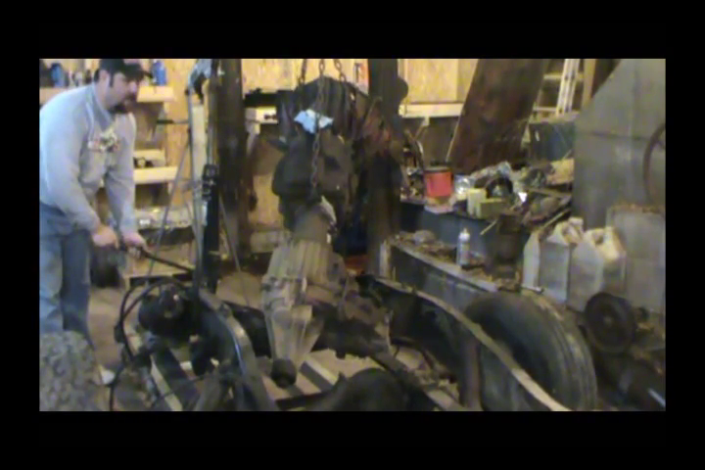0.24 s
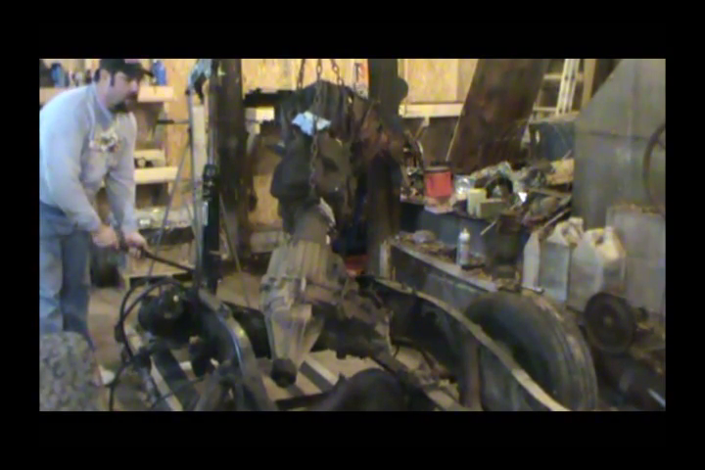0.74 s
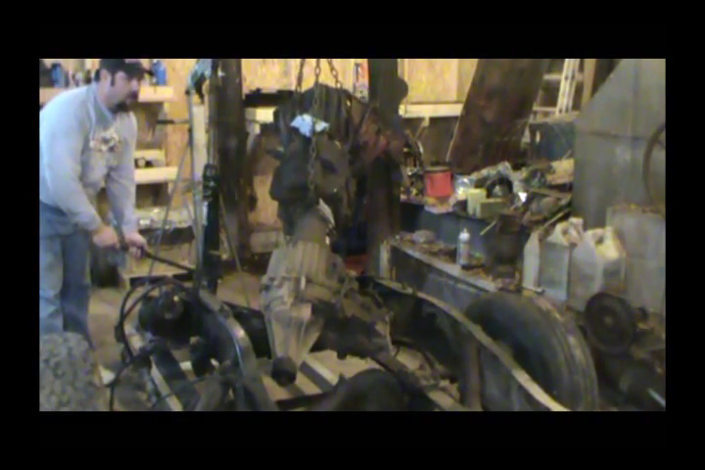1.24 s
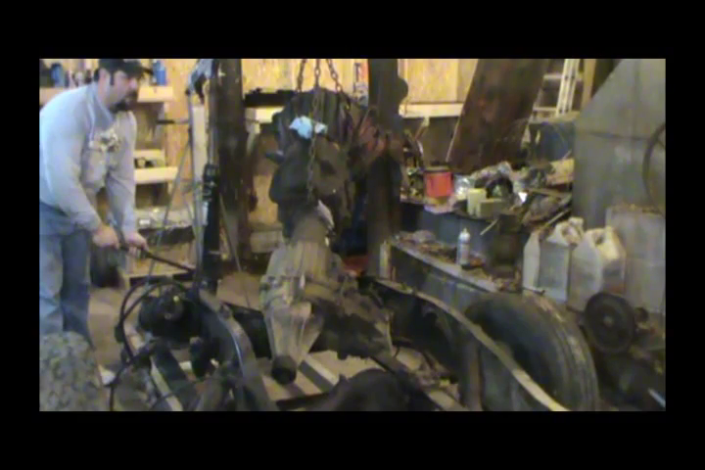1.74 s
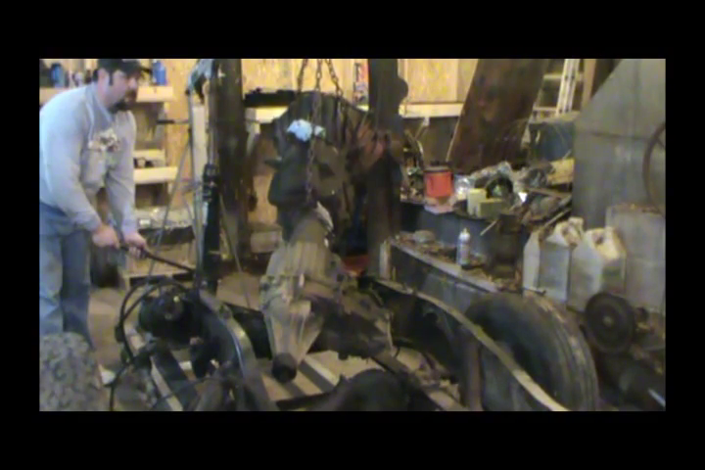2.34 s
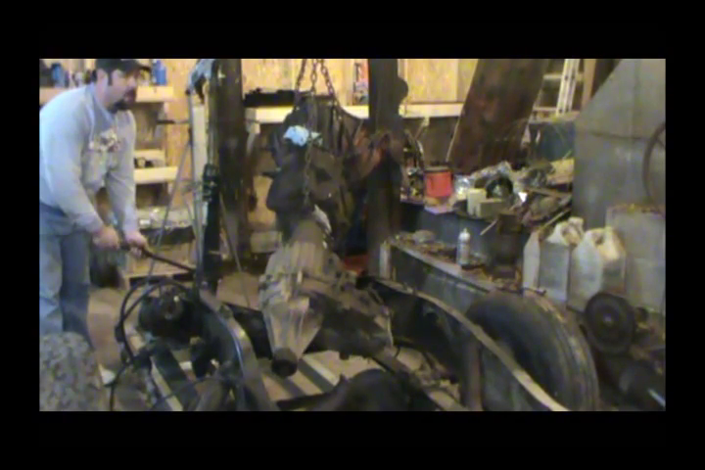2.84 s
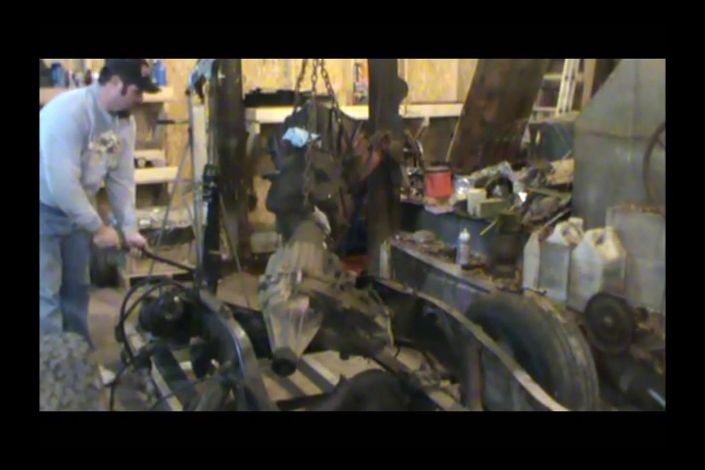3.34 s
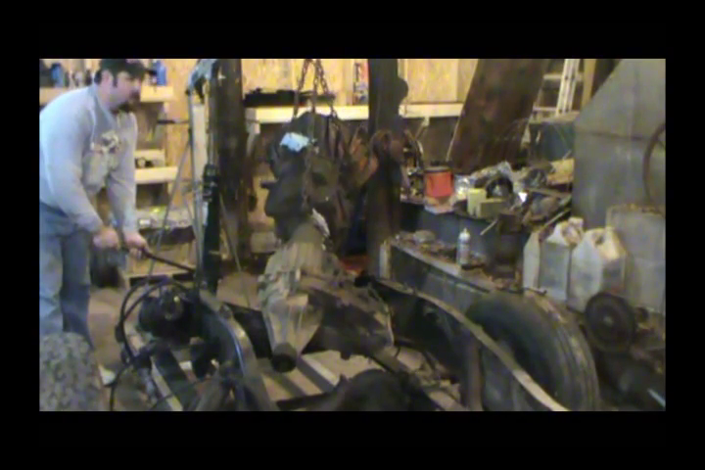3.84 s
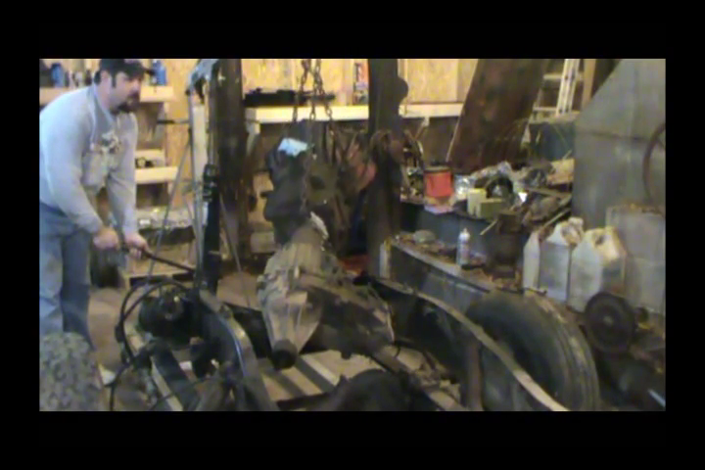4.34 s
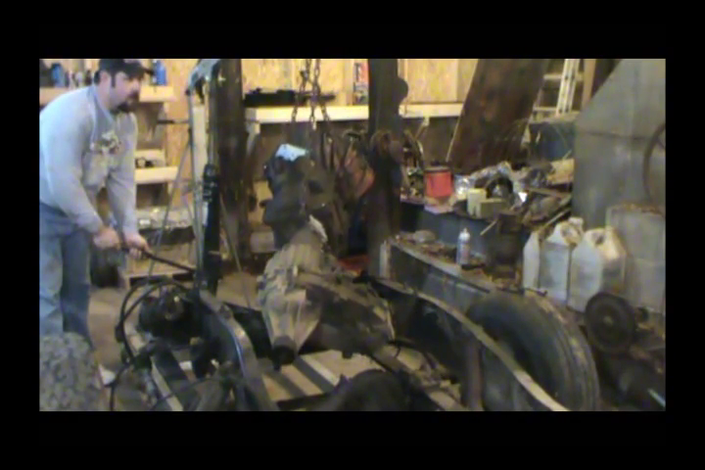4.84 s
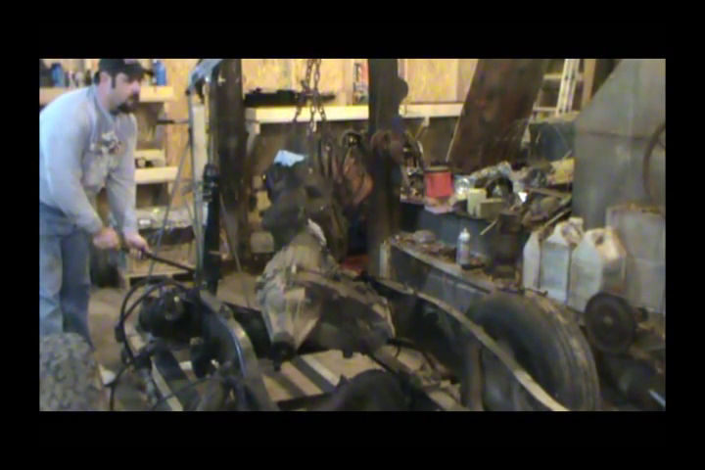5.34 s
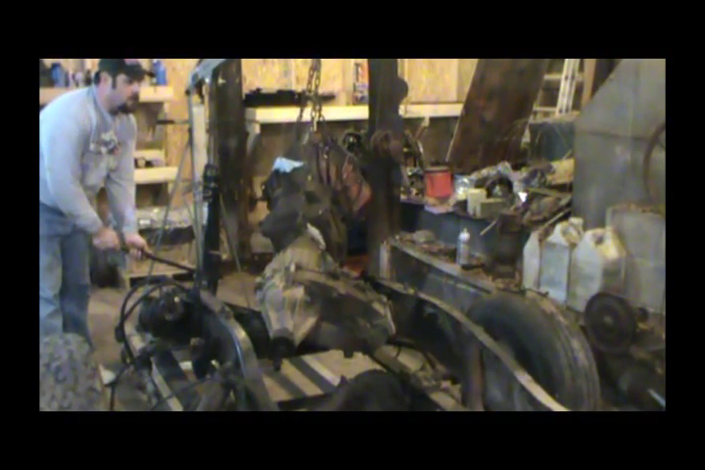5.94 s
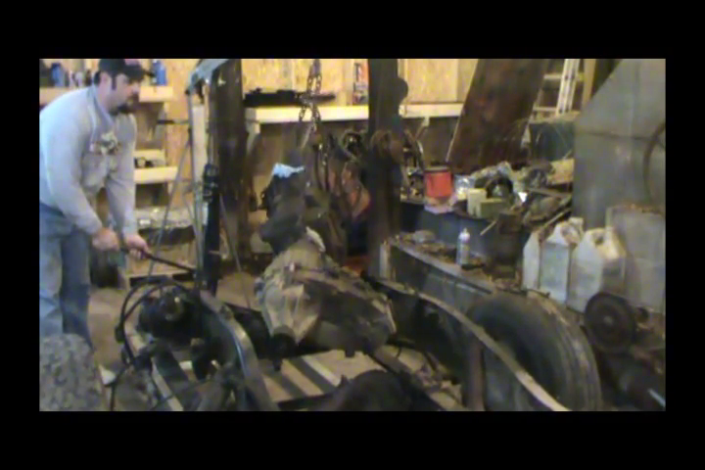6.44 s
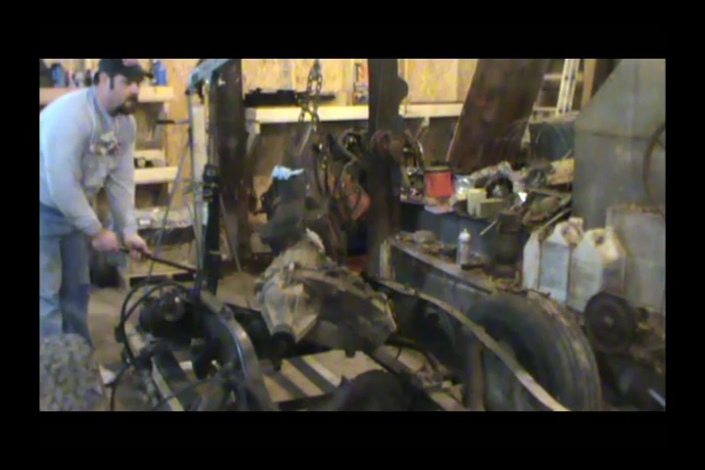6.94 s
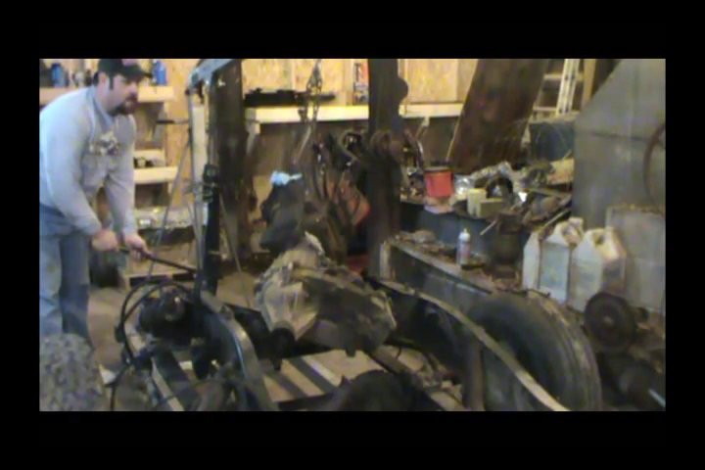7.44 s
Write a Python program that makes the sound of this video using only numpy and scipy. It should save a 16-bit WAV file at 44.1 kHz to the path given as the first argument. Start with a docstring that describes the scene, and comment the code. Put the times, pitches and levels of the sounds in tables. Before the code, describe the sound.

A wooden workshop with steady low rumble and faint hiss, heard through a camera microphone. From 0 to about 0.7 s there is low scuffing, with a light knock near 0.2 s; tiny knocks follow near 1, 1.3 and 1.9 s. The lens motor whirs in faint, rapid steps from 1.2 to 2.2 s. At 2.3 s iron contact begins, and hard clanks cluster at 2.45-2.6 s, leaving steel ringing. Chain links clink and rustle until 3.3 s, with a short squeak. Heavy blows resume from 3.45 to 4.4 s. Strong bangs strike at 4.9, 5.0 and 5.4 s, with the brightest chain clinks and squeaks at 5.2-5.5 s. Lighter clinks and rattles follow near 5.8-6.1 s, then heavy clangs at 6.5, 7.15 and 7.3 s and a weaker knock at 7.5 s. Each blow has a short, woody room tail.

```python
"""A wooden workshop: an engine block swings on a chain hoist over steady low rumble and microphone hiss, made as noise.
First come low scuffing and light knocks, then from about 1.2 to 2.2 s the faint steps of the camera's lens motor.
Hard blows follow to the end: rough spiky noise rings the casting, and decaying sines are the hoist's frame and bar.
Chain links clink as bright chatter, squeak as slipping sawtooths and rustle between blows, most brightly past 5 s.
Noise tails are the shed's answer to knocks and chain; a microphone curve and a limiter end the path."""
import sys
import numpy as np
from scipy import signal
from scipy.fft import rfft, irfft, next_fast_len
from scipy.io import wavfile
from scipy.ndimage import uniform_filter1d, minimum_filter1d, map_coordinates

SR = 44100
rng = np.random.default_rng(int(sys.argv[2]) if len(sys.argv) > 2 else 0)


def store_wav(level_fs):
    """Save 16-bit WAV to argv[1]."""
    pcm = np.round(np.clip(np.atleast_2d(level_fs), -1, 1) * 32767)
    wavfile.write(sys.argv[1], SR, pcm.T.astype(np.int16))


N = 339570
SPAN = SR  # samples in the longest single ring or shed tail
TOUCH = SPAN // 4  # samples in one contact

# edges of the bands that colour a contact: (frequency [Hz])
BAND_EDGES_HZ = np.array([100, 400, 1200, 2200, 4200, 8000, 15000])
# left-right likeness of diffuse sound in the shed: (frequency [Hz], correlation [-1 to 1])
SHED_ALIKE = [(60, 0.97), (150, 0.98), (380, 0.89), (950, 0.31), (2380, 0.48), (5980, 0.33), (15000, 1)]


def amp(db):
    """Decibels as an amplitude factor."""
    return 10 ** (np.asarray(db) / 20)


def unit(x):
    """A sound scaled to an rms of one over all its channels."""
    return x / np.sqrt(np.mean(x ** 2) + 1e-20)


def along(points, hz):
    """Values between (frequency [Hz], value) points, on a log frequency axis."""
    point_hz, value = np.transpose(points)
    return np.interp(np.log(hz + 1), np.log(point_hz + 1), value)


def curve(rows):
    """(time [s], level [dB]) rows as a gain for each sample, silent outside the rows."""
    s, db = np.transpose(rows)
    return amp(np.interp(np.arange(N) / SR, s, db, left=-200, right=-200))


def filtered(x, response):
    """A sound multiplied by a response over frequency, with room for the filter to ring out."""
    size = next_fast_len(x.shape[-1] + 4096)
    spectrum = rfft(x, size) * response(np.fft.rfftfreq(size, 1 / SR))
    return irfft(spectrum, size)[..., :x.shape[-1]]


def coloured(x, points):
    """A sound filtered by (frequency [Hz], gain [dB]) points."""
    return filtered(x, lambda hz: amp(along(points, hz)))


def spread(pair, alike):
    """Two unrelated signals mixed as mid and side to a given left-right likeness at each frequency."""
    def mid_side(hz):
        angle = np.arccos(np.clip(along(alike, hz), -1, 1)) / 2
        return np.array([np.cos(angle), np.sin(angle)])

    mid, side = filtered(pair, mid_side)
    return np.array([mid + side, mid - side])


def add(out, sound, s):
    """Mix a stereo sound in at a time in seconds, cut at the end of the scene."""
    part = out[:, round(s * SR):][:, :sound.shape[1]]
    part += sound[:, :part.shape[1]]


def peaking(sound, db):
    """A sound scaled so that three times its loudest short-time rms, taken as its peak, meets a level."""
    loudest = np.sqrt(uniform_filter1d(sound.mean(0) ** 2, size=1000).max())
    return sound * amp(db) / (3 * loudest)


def shed(x):
    """Direct sound plus a fresh noise tail: the wooden shed lets each frequency die at its own speed."""
    # reverberation time in the shed: (frequency [Hz], t60 [s])
    shed_t60 = [(100, 0.79), (300, 0.67), (800, 0.51), (2000, 0.49), (5000, 0.37), (13000, 0.23)]
    # level of the shed's answer over the direct sound: (frequency [Hz], level [dB])
    answer_db = [(100, 12), (500, -0.5), (2000, 5), (6000, 7), (14000, -7.5)]
    hz, t, noise = signal.stft(rng.standard_normal((2, SPAN)), SR, nperseg=256)
    decay = amp(-60 * t / along(shed_t60, hz)[:, None])
    decay = decay / np.linalg.norm(decay, axis=1, keepdims=True)
    decay = decay * amp(along(answer_db, hz))[:, None]
    tail = signal.istft(noise * decay * np.sqrt(len(t) / SPAN), SR, nperseg=256)[1][:, :SPAN]
    tail = np.pad(spread(tail, SHED_ALIKE), ((0, 0), (120, 0)))  # the first walls answer a few ms late
    return x + signal.fftconvolve(x[None], tail, axes=1)[:, :len(x)]


def ringing(modes, s=0, size=SPAN):
    """Decaying sines of an object tapped at time s; each tap finds its modes at new strengths."""
    hz, db, t60 = np.transpose(modes)[:, :, None]
    t = np.arange(size) / SR
    scatter_db = rng.normal(0, 2, hz.shape)
    decay = amp(db + scatter_db - 60 * t / t60)
    return (decay * np.sin(2 * np.pi * hz * (t + s))).sum(0)


def struck(source, modes, ring_db):
    """A contact heard directly and through the short modes of the part it shakes."""
    ring = ringing(modes, size=TOUCH)
    ring = ring / np.linalg.norm(ring)
    return source + amp(ring_db) * signal.fftconvolve(source, ring)[:len(source)]


def tilted(band_db, edges_hz, hardness_db):
    """Band levels tipped towards the treble by so many dB an octave: harder contacts are brighter."""
    octaves = np.log2(edges_hz[1:] * edges_hz[:-1] / (edges_hz[0] * edges_hz[1])) / 2
    return np.array(band_db) + hardness_db * octaves


def contact(source, band_db, edges_hz, length, rise, crack_db=-100):
    """A coloured source that swells and dies as parts touch; the first touch adds a bright crack."""
    t = np.arange(TOUCH) / SR
    shape = (1 - np.exp(-t / rise)) * np.exp(-t / np.clip(length, .002, .08))
    centres = np.sqrt(edges_hz[1:] * edges_hz[:-1])
    density = np.array(band_db) - 10 * np.log10(np.diff(edges_hz))  # band level to level per Hz
    below, above = (centres[0] / 3, density[0] - 20), (16500, density[-1] - 16)
    body = coloured(source, [below, *zip(centres, density), above])
    # treble lifted, the very top lost on the way to the microphone
    edge = filtered(body, lambda hz: hz / (1 + (hz / 11000) ** 4))
    crack = unit(edge) * np.std(body) * amp(crack_db) * np.exp(-t / 0.0016)
    return np.pad(body * shape + crack, (0, SPAN // 2))


def chatter():
    """Rough iron on iron: dense noise spikes of uneven size."""
    return amp(4.18 * rng.standard_normal(TOUCH)) * rng.standard_normal(TOUCH)


def slips(pitch_hz):
    """Stick and slip: a sawtooth whose rate wavers and sags."""
    sag_per_s = 0.6  # share of the starting pitch lost per second
    waver = .025 * unit(uniform_filter1d(rng.standard_normal(TOUCH), 150))
    rate_hz = pitch_hz * (1 + waver - sag_per_s * np.arange(TOUCH) / SR)
    return np.cumsum(rate_hz / SR) % 1 - .5


def air():
    """The workshop's low rumble and the microphone's hiss: steady noise with one colour and stereo width."""
    # spectrum of the background: (frequency [Hz], relative level per Hz [dB])
    air_colour = [(12, -25), (20, -11), (65, 4), (262, -4), (310, -2.5), (399, -3.5), (459, -8),
                  (698, -9.5), (1030, -19), (1860, -14.5), (2020, -16), (2600, -17.5), (16000, -31)]
    # left-right likeness of the background: (frequency [Hz], correlation [-1 to 1])
    air_alike = [(60, 1.0), (180, 1), (550, 0.86), (1650, -0.58), (4970, -0.089), (15000, 1)]
    noise = coloured(rng.standard_normal((2, N)), air_colour)
    return amp(-53) * unit(spread(noise, air_alike))


def scuffing():
    """Low scuffing: coloured noise made lumpy by a slow random swell, fading out over the first seconds."""
    # level of the scuffing: (time [s], level [dB])
    scuff_level = [(0.0, -38), (0.16, -42), (0.21, -37.5), (0.37, -49.5), (0.45, -52.5), (0.67, -56),
                   (0.8, -58), (0.96, -71), (1.1, -58), (1.26, -64), (1.45, -53), (1.55, -62), (2.2, -82)]
    colour = [(60, -34), (240, -4.5), (390, 0.5), (550, -10.5),
              (900, -9), (2000, -17), (6000, -32.5), (17000, -51)]  # (frequency [Hz], gain [dB])
    lumps = amp(2.2 * map_coordinates(rng.standard_normal(200), [np.linspace(0, 198, N)]))
    noise = spread(coloured(rng.standard_normal((2, N)), colour), SHED_ALIKE)
    return curve(scuff_level) * unit(lumps * noise)


def lens():
    """The camera's stepping motor: each step gives a short whine and ticks, every second step's ticks stronger."""
    # timing of the motor: (first step [s], step rate [per s])
    step_timing = 1.2307, 30000 / 1001
    # whine, then two ticks: (frequency [Hz], level [dB], delay after the step [s], width [s])
    step_tones = [(1900, 0, .012, .009), (3550, 3, .002, .0025), (4850, -2, .002, .0025)]
    full_from_s, full_to_s, fade_s = 1.24, 2.2, .08  # the fades lie outside the full run
    first, rate = step_timing
    t = np.arange(N) / SR
    step = np.floor((t - first + 0.01) * rate)
    since = t - first - step / rate
    size = amp(2.8 * rng.standard_normal(300))[step.astype(int) % 300]
    tremble = .7 * unit(uniform_filter1d(rng.standard_normal(N), 200))  # the motor runs unevenly
    tick_gain = amp(-7 * (step % 2))
    tones = 0
    for (hz, db, delay, width), gain in zip(step_tones, [1, tick_gain, tick_gain]):
        pulse = np.exp(-((since - delay) / width) ** 2 / 2)
        tones = tones + amp(db) * gain * pulse * np.sin(2 * np.pi * hz * t + tremble)
    running = np.clip(np.minimum(t - full_from_s, full_to_s - t) / fade_s + 1, 0, 1) ** 2
    return amp(-60) * running * size * tones


def rustle():
    """Slack chain between the blows: sparse random touches, coloured and answered by the shed."""
    # level of the rustle before panning: (time [s], level [dB])
    rustle_level = [(2.1, -76), (2.24, -52), (3.25, -55.5), (3.38, -44), (3.5, -55), (4.5, -55.5),
                    (4.7, -51.5), (4.85, -49), (5.7, -56), (5.95, -45.5), (6.1, -60.5), (7.7, -60.5)]
    colour = [(300, 3), (1500, 5.2), (3000, 3.2), (8000, -6.5), (16000, -5)]  # (frequency [Hz], gain [dB])
    size = amp(3 * rng.standard_normal(N)) * rng.standard_normal(N)
    touches = (rng.random(N) < .06) * size
    return curve(rustle_level) * unit(shed(coloured(touches, colour)))


def squeaks():
    """Loaded links stick and slip: short coloured sawtooths, answered by the shed."""
    # squeaks: (time [s], peak level before panning [dB], starting pitch [Hz],
    # hardness [dB per octave], decay constant [s])
    squeak_rows = [(0.423, -53, 3140, -13, 0.096), (3.269, -29, 2214, -5.5, 0.0055),
                   (5.233, -22.5, 2173, -0.5, 0.03), (5.27, -20.5, 2055, -5.5, 0.023),
                   (5.491, -20, 1980, 1, 0.0073), (5.929, -38.5, 2030, -5, 0.013)]
    # an average squeak in the bands from 1200 Hz up: (level [dB])
    squeak_bands = [-21.5, -5.5, -3.5, 10]
    out, edges = np.zeros((2, N)), BAND_EDGES_HZ[2:]
    for s, db, pitch_hz, hardness_db, length in squeak_rows:
        bands = tilted(squeak_bands, edges, hardness_db)
        squeak = contact(slips(pitch_hz), bands, edges, length, rise=0.00098)
        add(out, peaking(shed(squeak), db), s)
    return out


def clinks():
    """Links meet: short bright chatter rings the modes of a link, answered by the shed."""
    # clinks: (time [s], peak level before panning [dB], pitch of the strongest nominal mode [Hz],
    # hardness [dB per octave], ring over direct contact [dB], decay constant [s])
    clink_rows = [(1.1807, -48, 3550, -9, -3, 0.0039), (2.2117, -34, 2930, -3.5, -36, 0.027),
                  (2.727, -31, 2720, -3.5, -11, 0.039), (2.949, -28, 2860, -2.5, -6, 0.011),
                  (2.961, -25, 2630, -7.5, -12, 0.016), (3.119, -28, 2720, -6.5, -1, 0.01),
                  (3.269, -34, 2300, 0, -11, 0.039), (5.212, -31, 2480, -9, -16, 0.0064),
                  (5.234, -26, 8800, 9, 6, 0.0032), (5.2575, -21, 8740, 4, 6, 0.0048),
                  (5.293, -25.5, 3355, -4, 9, 0.008), (5.337, -28.5, 8600, -4, -16, 0.0022),
                  (5.513, -19.5, 7880, 12, 22, 0.0062), (5.7697, -24, 2790, -1, -9.5, 0.0062),
                  (6.782, -43, 3300, 2, -11, 0.0054)]
    # an average clink in the bands from 400 Hz up: (level [dB])
    clink_bands = [-12.5, -14.5, 3, -3.5, 7.5]
    # modes shared by the links: (frequency [Hz], relative level [dB], t60 [s])
    link_modes = [(1650, -7, .03), (2640, 0, .025), (2950, -3, .02), (3350, -3, .035), (3740, -4, .03),
                  (4500, -10, .012), (7620, -3, .012), (8300, -5, .01), (9150, -5, .01), (9850, -8, .01),
                  (10800, -9, .01)]
    out, edges = np.zeros((2, N)), BAND_EDGES_HZ[1:]
    for s, db, link_hz, hardness_db, ring_db, length in clink_rows:
        bands = tilted(clink_bands, edges, hardness_db)
        touch = contact(chatter(), bands, edges, length, rise=0.0017, crack_db=11)
        clink = struck(touch, link_modes + [(link_hz, 4, .05)], ring_db)
        add(out, peaking(shed(clink), db), s - .002)
    return out


def chain():
    """The whole chain: clinks, squeaks and rustle, a little stronger on the right."""
    return (clinks() + squeaks() + rustle()) * amp([[-.4], [.4]])


def hoist():
    """Post, frame and bar take up a blow a moment late; a new blow feeds the ring already there."""
    # blows that leave the long steel parts ringing: (time [s], post [dB], frame [dB], bar [dB])
    ring_rows = [(2.45, -40, -54, -26), (2.54, -44, -54, -18.5), (3.67, -36, -39.5, -49),
                 (3.765, -56, -49, -33), (3.905, -48, -63, -42), (4.08, -44, -56, -30.5),
                 (4.295, -68, -52, -32), (4.38, -70, -70, -26.5), (4.872, -46, -52, -24),
                 (5.025, -46, -39.5, -23), (5.414, -41.5, -55, -21.5), (6.1, -47, -67, -45),
                 (6.532, -29, -33, -29.5), (7.155, -31, -39, -50), (7.303, -50, -31, -33.5)]
    # modes of the post: (frequency [Hz], relative level [dB], t60 [s])
    post_modes = [(64, -3, .3), (97, -2, .5), (138, 0, 1.25)]
    # modes of the frame: (frequency [Hz], relative level [dB], t60 [s])
    frame_modes = [(429, 6, .9), (1287, -9, .65), (1647, -7, 1.3), (1664, -12, 1.1), (12400, -20, .3)]
    # modes of the steel bar: (frequency [Hz], relative level [dB], t60 [s])
    bar_modes = [(1518, 0, .8), (1527, -11, .6), (1588, 1, .38), (1650, -3, .3), (1701, -1, .4),
                 (1782, -2, .15)]
    out = np.zeros((2, N))
    swell = 1 - np.exp(-np.arange(SPAN) / SR / 0.0076)
    for s, post_db, frame_db, bar_db in ring_rows:
        at = round(s * SR) / SR  # the modes keep their phase from blow to blow
        hum = amp(post_db) * ringing(post_modes, at)
        ring = amp(frame_db) * ringing(frame_modes, at) + amp(bar_db) * ringing(bar_modes, at)
        # the long parts stand off to one side: the right channel hears them some samples later
        left, right = ring + hum, np.roll(ring, 4) + np.roll(hum, 18)
        add(out, swell * np.array([left, right]), s)
    return out


def load():
    """The engine block strikes iron: rough chatter shakes its casting, and the shed answers."""
    # knocks: (time [s], peak level before panning [dB], hardness [dB per octave], thud over body [dB],
    # clash of loose parts at 2-4 kHz over average [dB], crack of the first touch over body [dB],
    # contact decay constant [s], casting ring over direct contact [dB])
    knock_rows = [(0.143, -34.5, -5, -29, -1, -5, 0.022, -22), (0.2, -25, -7, -1.5, -9, 7, 0.023, -20),
                  (0.986, -39, -7, -2, -22, -17, 0.028, -8), (1.292, -44.5, 2.5, 1.2, 2, -1, 0.043, -19),
                  (1.871, -42.5, 0.5, -30, 2, 1, 0.045, -24),
                  (2.277, -17.5, 3.5, -14, 4, -10, 0.0079, -16.5),
                  (2.446, -7, 4, -11, -2, -3.5, 0.021, -8.5), (2.488, -8.5, 0, -39, -0.5, -21, 0.041, -20),
                  (2.529, -6.5, 0.5, -31, 1.5, -4, 0.038, -40),
                  (2.567, -12.5, 7, -3, -6.5, 11, 0.017, -0.5), (3.454, -19, 2, -3, 5.5, 2, 0.038, -21),
                  (3.473, -15, -1.5, -22, -7, -27, 0.044, -10.5),
                  (3.664, -9, -1, -10.5, -1.8, -22, 0.035, -18.5),
                  (3.763, -8, 1.65, -15, -4, -5.5, 0.038, -11.5),
                  (3.901, -7, -2.5, -20.5, -1, -24, 0.034, -18),
                  (4.039, -9.5, 0.5, -5.5, -0.5, -8, 0.026, -11),
                  (4.08, -5, 2, -29, -6.5, -14, 0.024, -13.5), (4.293, -17.5, -3, -53, -4, -7, 0.029, -19),
                  (4.377, -11.5, -2, -23.5, 3.5, -4, 0.023, -49),
                  (4.87, -5.5, 1.16, -17, 2.5, -9, 0.025, -8),
                  (5.023, -0.3, -4.5, -34, -0.5, -2, 0.013, -12), (5.07, -16, 0, -11.5, -5, -6, 0.065, -16),
                  (5.415, -3.5, -1, -20.5, -2.4, -4.5, 0.037, -28),
                  (5.479, -15.5, 1, -13, 4, -7, 0.018, -7), (6.092, -21, 4.5, 3, 8, -13, 0.029, -14),
                  (6.11, -17, -0.2, -38, 6.5, -8, 0.024, -15.5),
                  (6.366, -31.5, -2.8, -14, 0.5, -3.5, 0.02, -23),
                  (6.53, -5.5, 1, -19, -2.5, -15, 0.029, -11.5), (6.584, -10, -2, -24, 3, -3, 0.012, -27),
                  (7.155, -5, 0.5, -15.5, -6.5, -5, 0.02, -13), (7.198, -13, -1.5, -20, -5, -9, 0.03, -14),
                  (7.3, -7, -1.5, -20, -4, -14, 0.024, -15.5),
                  (7.523, -18.5, -2.5, -12.5, -0.5, -5, 0.027, -35)]
    # an average knock in the bands from 400 Hz up: (level over body [dB])
    knock_bands = [0, -4.5, -4, -11.5, -18]
    # modes of the casting: (frequency [Hz], relative level [dB], t60 [s])
    casting_modes = [(425, 7, 0.2), (568.4, 12, 0.024), (640, 22, 0.027), (879, 13, 0.078),
                     (1172, 21.5, 0.013), (1622, 12, 0.25), (2160, -2, 0.26), (2703, 5, 0.05),
                     (3430, 14, 0.011), (4570, 12.5, 0.052), (5070, 16.5, 0.023), (7940, -22, 0.014)]
    pan_db = -0.93  # left over right
    out = np.zeros((2, N))
    for s, db, hardness_db, thud_db, clash_db, crack_db, length, casting_db in knock_rows:
        body, clang, clash, edge, sizzle = tilted(knock_bands, BAND_EDGES_HZ[1:], hardness_db)
        bands = [thud_db, body, clang, clash + clash_db, edge, sizzle]
        touch = contact(chatter(), bands, BAND_EDGES_HZ, length, rise=0.0048, crack_db=crack_db)
        knock = struck(touch, casting_modes, casting_db)
        add(out, peaking(shed(knock), db), s - .003)
    return out * amp([[pan_db / 2], [-pan_db / 2]])


def scene():
    """Everything that reaches the microphone, from the background to the swinging load."""
    return air() + scuffing() + lens() + chain() + hoist() + load()


def record(dry):
    """The microphone colours the sound, a limiter holds loud blows down, the top is cut at a band limit."""
    # microphone response: (frequency [Hz], gain [dB])
    microphone = [(25, -6), (45, 0), (200, 0), (300, -4), (420, 0), (6200, -1), (7300, 3), (8300, 0),
                  (16000, 0)]
    heard = coloured(dry, microphone)
    level = uniform_filter1d(np.abs(heard).max(0), 40)
    gain = (1 + (level / amp(-7.5)) ** 3) ** (-1 / 3)
    gain = uniform_filter1d(minimum_filter1d(gain, 900), 900)  # one smooth gain for both channels
    held = heard * gain
    held = held / (1 + np.abs(held / .7) ** 6) ** (1 / 6)  # the converter rounds off the highest spikes
    return filtered(held, lambda hz: hz < 16300)


dry = scene()
out = record(dry)
store_wav(out)
```